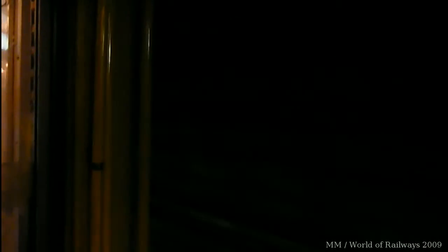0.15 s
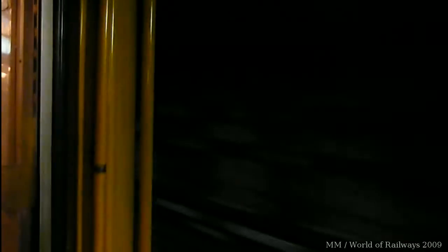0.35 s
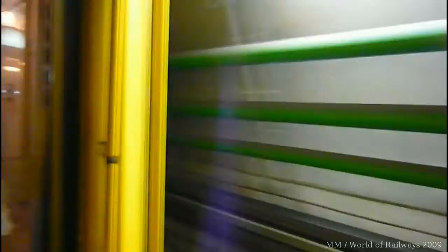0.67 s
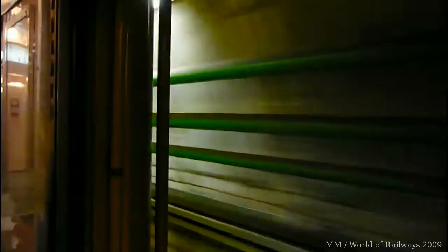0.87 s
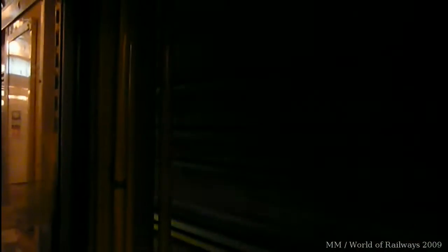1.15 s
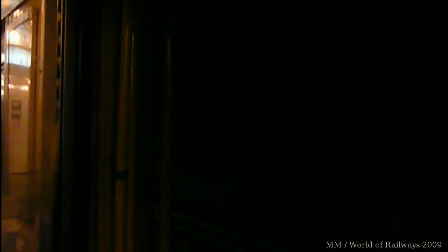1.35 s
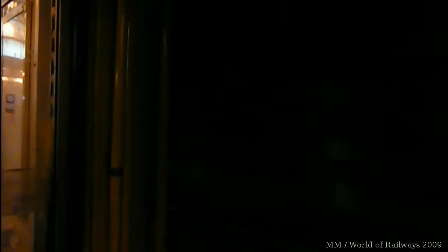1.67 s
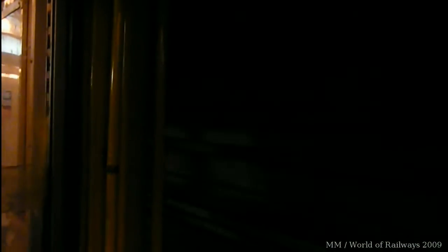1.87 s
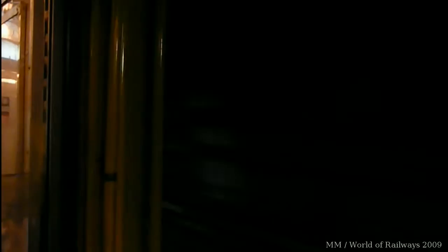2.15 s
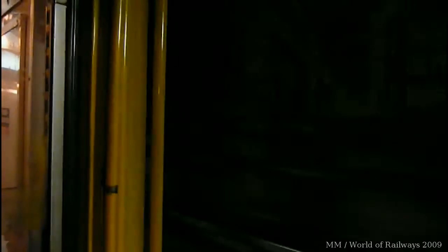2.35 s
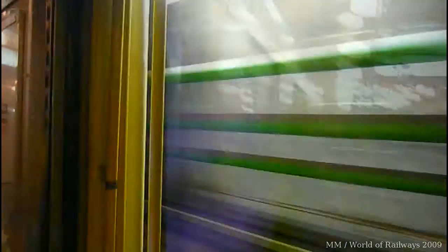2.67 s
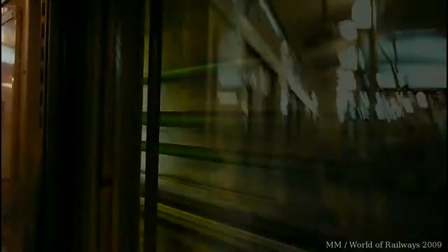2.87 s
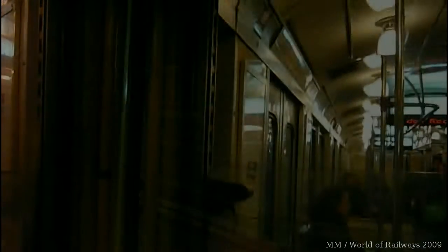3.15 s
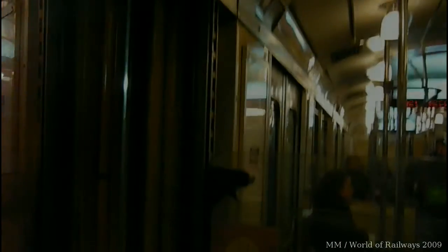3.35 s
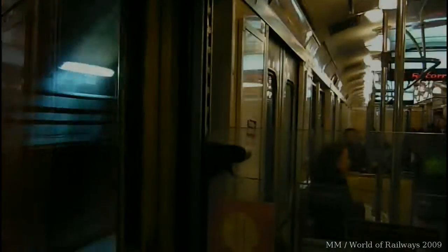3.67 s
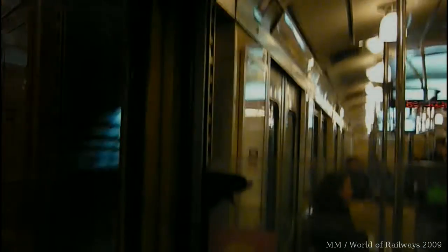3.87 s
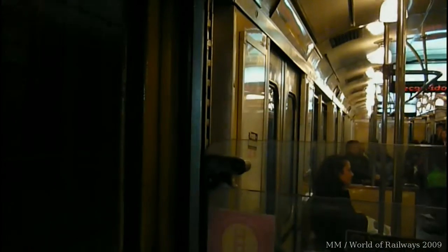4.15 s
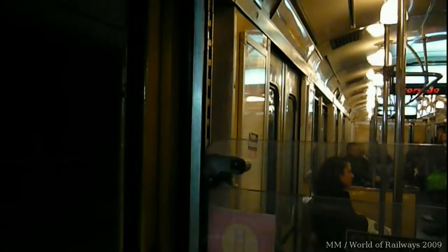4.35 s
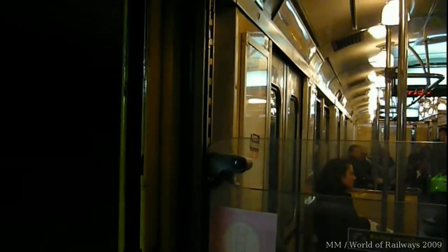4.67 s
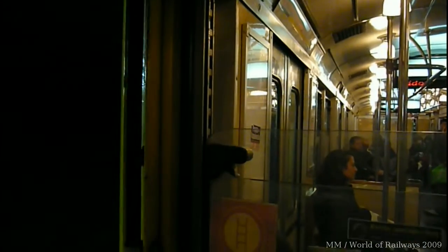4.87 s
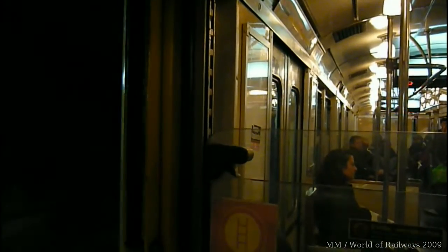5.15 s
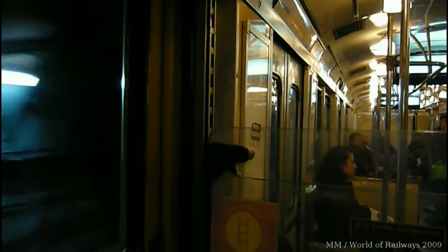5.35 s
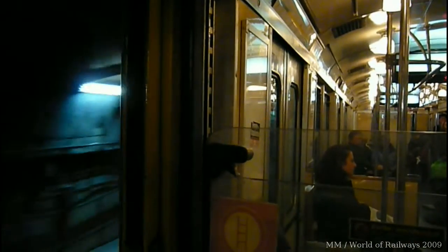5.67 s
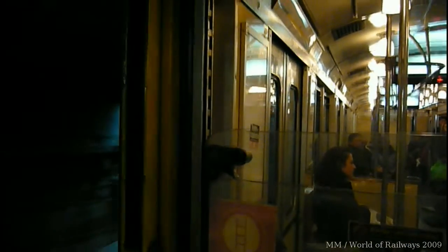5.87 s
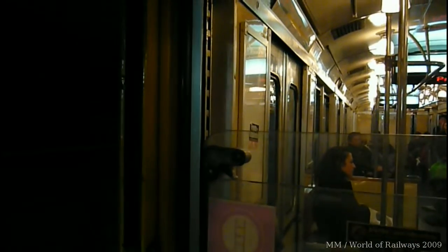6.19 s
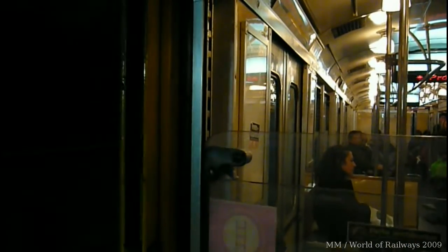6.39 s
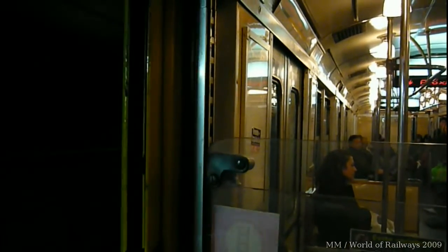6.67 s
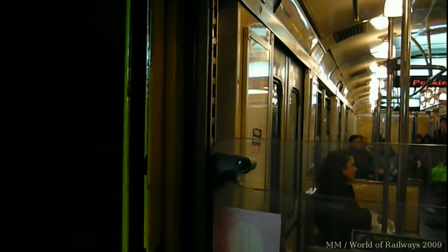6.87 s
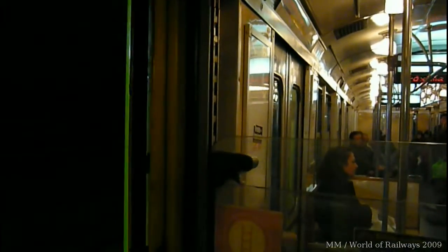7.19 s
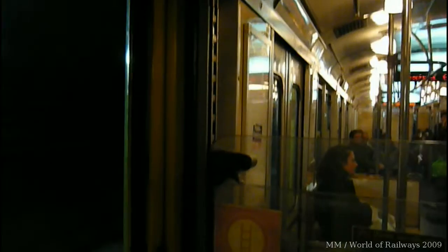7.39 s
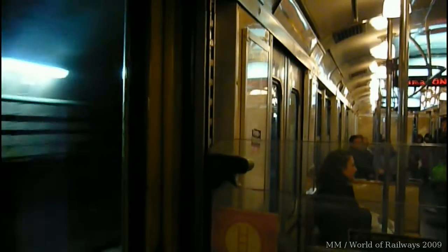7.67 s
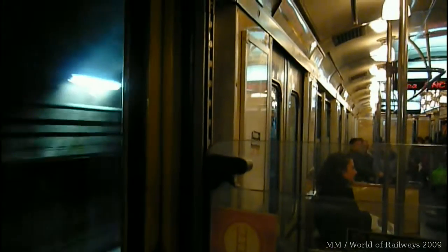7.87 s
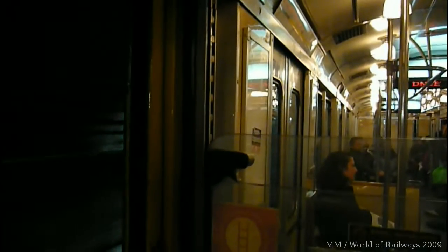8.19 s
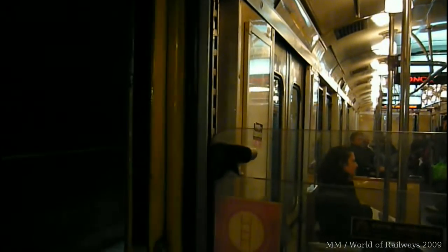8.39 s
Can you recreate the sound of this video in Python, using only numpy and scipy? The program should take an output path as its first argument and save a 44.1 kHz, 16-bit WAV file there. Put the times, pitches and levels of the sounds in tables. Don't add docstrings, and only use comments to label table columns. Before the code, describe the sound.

An electric subway car rolls fast through a tunnel, heard from the gangway on a small, dull, narrow-band microphone. A continuous rough roar of floor, panels and wheels fills everything, with loose fittings rattling. Irregular rail-joint knocks and low floor thumps punctuate it, with a tiny flange squeak early and a small click just after two seconds. The roar shifts slightly in tone, and knocks crowd together toward the end.

```python
import sys
import numpy as np
from scipy import signal
from scipy.fft import rfft, irfft, next_fast_len
from scipy.io import wavfile
from scipy.ndimage import uniform_filter1d, map_coordinates

SR = 44100
rng = np.random.default_rng(int(sys.argv[2]) if len(sys.argv) > 2 else 0)


def boost_factor(decibels):
    exponent = np.asarray(decibels, float) / 20
    return 10 ** exponent


def bounce(signal):
    frames = np.transpose(np.atleast_2d(signal))
    limited = np.clip(frames, -1, 1)
    pcm = np.round(limited * 32767).astype(np.int16)
    wavfile.write(sys.argv[1], SR, pcm)


N = 376173
SPLICE_S = 103011 / 44100

# (time [s], peak level [dB], thud pitch [Hz], clink level [dB])
JOINTS = [(0.718, -9, 610, -23.5), (0.975, -3.5, 792, -20.5), (1.265, -7, 727, -24.5),
          (1.311, -8, 504, -18), (1.873, -7.5, 485, -24.5), (2.529, -14, 780, -17.5),
          (2.731, -10.5, 680, -21.5), (2.872, -9.5, 613, -19.5), (2.981, -8, 737, -23.5),
          (3.227, -5.5, 650, -19.5), (3.377, -8, 579, -19.5), (3.594, -5.5, 557, -22),
          (3.866, -5.5, 632, -25.5), (4.097, -6, 756, -20.5), (5.146, -9, 600, -15.5),
          (5.49, -5.5, 640, -14.5), (5.634, -3, 630, -21.5), (5.697, -3.5, 458, -19.5),
          (5.998, -3, 732, -21.5), (6.13, -9, 504, -22), (6.493, -4.5, 640, -23), (6.804, -6, 563, -20.5),
          (7.123, -6.5, 625, -21.5), (7.33, -6, 600, -16), (7.682, -5, 622, -22), (7.998, -2.5, 740, -14),
          (8.088, -2.5, 707, -10.5), (8.232, -1.5, 517, -20.5), (8.306, -6, 658, -19)]


def unit(x):
    return x / np.sqrt(np.mean(x ** 2) + 1e-20)


def wobble(rate_hz):
    knots = rng.standard_normal(int(N * rate_hz / SR) + 4)
    return map_coordinates(knots, [np.arange(N) * rate_hz / SR])


def coloured(x, spectrum):
    size = next_fast_len(N + 8192)
    hz, db = np.transpose(spectrum)
    bins_hz = np.fft.rfftfreq(size, 1 / SR)
    gain = boost_factor(np.interp(np.log(bins_hz + 1), np.log(hz + 1), db))
    return unit(irfft(rfft(x, size) * gain, size)[:N])


def roughness(patchy_db):
    bins = signal.stft(rng.standard_normal(N), nperseg=512)[2]
    patches = uniform_filter1d(rng.standard_normal(bins.shape), size=4, axis=0)
    patches = uniform_filter1d(patches, size=8, axis=1)
    noise = signal.istft(bins * boost_factor(patchy_db * unit(patches)), nperseg=512)[1]
    return unit(noise[:N])


def rattle(spread_db, count):
    when, sign, size = rng.random((count, 3)).T
    blows = np.sign(sign - 0.5) * boost_factor(spread_db * size ** 3)
    return unit(np.bincount((when * N).astype(int), blows, N))


def microphone(x):
    # (frequency [Hz], gain [dB])
    band_edge = [(3200, 1), (3400, -0.5), (3550, -5), (3700, -14.5), (3850, -49.5), (4000, -120)]
    return coloured(x, band_edge) * np.std(x)


def rolling(view):
    # (frequency [Hz], density [dB per Hz])
    boom_spectrum = [(12, -38.5), (25, -23), (35, -14), (50, -9.5), (83, -0.5), (110, -4), (140, -29.5),
                     (240, -120)]
    # (frequency [Hz], density [dB per Hz])
    floor_spectra = [
        [(65, -38.5), (110, -12.5), (120, -10), (140, -6.5), (172, -0.5), (253, -5.5), (307, -1.5), (370, -6.5), (480, -30), (810, -120)],
        [(65, -35.5), (110, -4.5), (156, -2.5), (193, 0.5), (269, -3.5), (296, -1), (324, -4.5), (370, -8), (480, -40), (810, -120)],
    ]
    # (frequency [Hz], density [dB per Hz])
    panel_spectra = [
        [(220, -35), (370, -3), (420, -0.5), (480, -2.5), (525, 1), (573, -5), (625, 0.5), (692, -4), (750, 0.5), (825, -2.5), (895, -7.5), (980, -6), (1250, -15), (1620, -44.5), (2750, -120)],
        [(220, -35.5), (370, -5), (420, 0), (480, -2), (553, -3), (625, 1), (690, -3.5), (750, -1), (810, -3.5), (900, -8), (985, -5), (1250, -17.5), (1620, -45), (2750, -120)],
    ]
    # (frequency [Hz], density [dB per Hz])
    wheel_spectra = [
        [(740, -28.5), (1250, -7.5), (1370, -0.5), (1530, -4.5), (1820, -5.5), (1990, -6), (2370, -7), (2510, -12), (2860, -8.5), (3070, -11.5), (3300, -18), (4290, -50.5), (7260, -120)],
        [(740, -29.5), (1250, -0.5), (1310, -2.5), (1640, -2.5), (1780, -4), (1990, -1.5), (2330, -2.5), (2680, -8), (2910, -5), (3130, -10), (3300, -15.5), (4290, -45.5), (7260, -120)],
    ]
    # (boom level [dB], floor level [dB], panels level [dB], wheels level [dB])
    levels_db = [
        (-38.5, -21, -20, -32.5),
        (-32.5, -20.5, -21, -31.5),
    ]
    # (time [s], rail roughness [dB], sway of the car on its springs [dB])
    rail = [(0, -1, 0), (.8, 0.5, 0), (1.6, 0.5, 0), (2.4, 0, -0.5), (3.2, -0.5, -1), (3.8, -1, 0.5),
            (4.4, -0.5, 0.5), (5, -1, 1), (5.6, -1, 0.5), (6.2, 0, -0.5), (6.8, 1.5, -0.5), (7.3, 2, -1.5),
            (7.8, 0, 0), (8.53, 0, 0)]
    # (to roughness [dB per dB], to sway [dB per dB])
    follows = [
        (0.7, 1.2),
        (.3, .9),
        (.9, .1),
        (0.6, .1),
    ]
    shake_db = .8, 1.2
    wheels_rise_db_per_s = -0.1, 0.08

    t = np.arange(N) / SR
    knots_s, rough_knots_db, sway_knots_db = np.transpose(rail)
    rough_db = np.interp(t, knots_s, rough_knots_db)
    sway_db = np.interp(t, knots_s, sway_knots_db)
    boom_db, floor_db, panels_db, wheels_db = [
        db + per_rough * rough_db + per_sway * sway_db
        for db, (per_rough, per_sway) in zip(levels_db[view], follows)]
    wheels_db = wheels_db + wheels_rise_db_per_s[view] * (t - t.mean())

    jolt_db = shake_db[view] * unit(wobble(13) + 0.5 * wobble(30))
    blows = rattle(spread_db=10, count=1500)
    boom = coloured(roughness(patchy_db=0.2), boom_spectrum)
    floor = coloured(roughness(patchy_db=0.68) + 0.32 * blows, floor_spectra[view])
    panels = coloured(roughness(patchy_db=0.28) + 0.3 * blows, panel_spectra[view])
    wheels = coloured(roughness(patchy_db=1.03) + 0.34 * blows, wheel_spectra[view])

    body = boost_factor(boom_db) * boom + boost_factor(floor_db + 0.1 * jolt_db) * floor
    body = body + boost_factor(panels_db + jolt_db) * panels
    return microphone(body + boost_factor(wheels_db + 0.71 * jolt_db) * wheels)


def clink(t):
    # (frequency [Hz], level [dB], 60 dB decay [s])
    modes = [(1150, 0, .006), (1550, -1, .006), (2000, -1, .008), (2400, -3, .007), (2950, -7, .005),
             (3300, -15, .005)]
    ring = sum(boost_factor(db + rng.normal(0, 1.5) - 60 * t / t60_s) * np.sin(2 * np.pi * hz * t)
               for hz, db, t60_s in modes)
    return ring * (1 - np.exp(-t / 0.0004))


def thud(t, hz, cycles):
    late = t * hz - 1.3
    return np.exp(-(late / cycles) ** 2) * np.cos(2 * np.pi * late)


def knocks():
    # (time [s], peak level [dB])
    ticks = [
        (0.2942, -19),
        (0.8021, -19),
        (0.9951, -23.5),
        (3.002, -10.5),
        (4.5141, -23),
        (4.9666, -19.5),
        (6.4662, -6.5),
        (7.1875, -18.5),
    ]
    # (time [s], peak level [dB], pitch [Hz])
    thumps = [(0.504, -11, 171.5), (1.042, -8, 315), (2.417, -18.5, 178), (2.47, -13, 363),
              (2.709, -10.5, 176), (3.565, -8.5, 255), (3.653, -4.5, 221.5), (4.736, -6, 179.4),
              (4.963, -8, 233), (5.146, -5.5, 176), (5.286, -13, 293), (5.537, -4.5, 188),
              (5.69, -11.5, 300), (6.119, -8.5, 162), (6.392, -5.5, 285), (7.762, -7.5, 171)]
    # (frequency [Hz], gain [dB])
    soft_edge = [(2900, 0), (3200, -7), (3450, -24), (3700, -60), (3950, -120)]

    out, t = np.zeros(N + SR), np.arange(SR // 20) / SR
    for s, db, hz, clink_db in JOINTS:
        blow = thud(t, hz, cycles=0.7) + boost_factor(clink_db + 6.5) * clink(t)
        out[round(s * SR):][:len(t)] += boost_factor(db - 2.5) * blow
    for s, db in ticks:
        out[round(s * SR):][:len(t)] += boost_factor(db - 2.5) * clink(t)
    for s, db, hz in thumps:
        out[round(s * SR):][:len(t)] += boost_factor(db - 4.0) * thud(t, hz, cycles=0.8)
    return coloured(out[:N], soft_edge) * np.std(out[:N])


def squeaks():
    # (time [s], pitch [Hz], level [dB], half length [s])
    touches = [
        (.692, 1780, -28, .024),
        (.64, 1780, -38, .03),
        (.52, 1850, -35, .02),
        (5.98, 1570, -33, .025),
        (4.675, 2350, -34.5, .014),
        (4.675, 2050, -34.5, .014),
    ]
    t = np.arange(N) / SR
    drift_rad, slip_db = 0.9 * wobble(60), 2.5 * wobble(70)
    out = np.zeros(N)
    for s, hz, db, half_s in touches:
        swell = np.exp(-((t - s) / half_s) ** 2)
        out += boost_factor(db + slip_db) * swell * np.sin(2 * np.pi * hz * t + drift_rad)
    return out


def duck(depth):
    moments = np.bincount([round(s * SR) for s, *_ in JOINTS], minlength=N)
    dip = np.exp(-(np.arange(-500, 501) / SR / 0.004) ** 2)
    return 1 - depth * signal.fftconvolve(moments, dip, "same")


def splice_click(t):
    return 0.19 * np.where(t < 0, -1, 1) * np.exp(-abs(t) / 0.001)


def scene():
    # (time after the splice [s], first view gain [1], second view gain [1])
    dissolve = [
        (0, 1, 0),
        (.4, 1, .13),
        (.9, 1, .38),
        (1.5, .86, .53),
        (2.1, .45, .92),
        (2.5, .15, 1),
        (2.8, 0, 1),
    ]
    frame_s, offset = 0.04, -0.071
    t = np.arange(N) / SR - SPLICE_S
    frame_start_s = np.floor(t / frame_s) * frame_s
    knots_s, first_knots, second_knots = np.transpose(dissolve)
    first = np.interp(frame_start_s, knots_s, first_knots)
    second = np.interp(frame_start_s, knots_s, second_knots)
    ride = duck(depth=0.33) * (first * rolling(0) + second * rolling(1))
    return (ride + offset * (first + second) + knocks() + squeaks() + splice_click(t))[None]


def low_pass(x):
    return signal.sosfilt(signal.butter(12, 15850, fs=SR, output="sos"), x)


def record(dry):
    hiss = boost_factor(-99) * rng.standard_normal(dry.shape)
    return low_pass(dry + hiss)


dry = scene()
out = record(dry)
bounce(out)
```